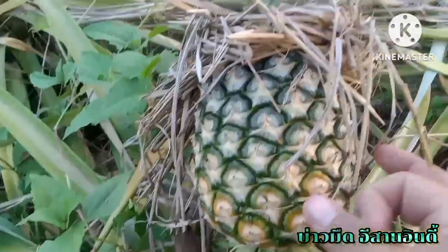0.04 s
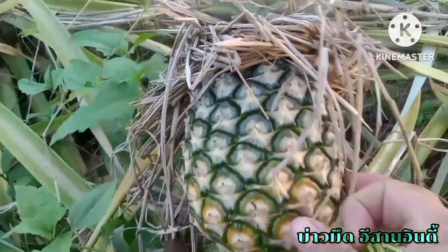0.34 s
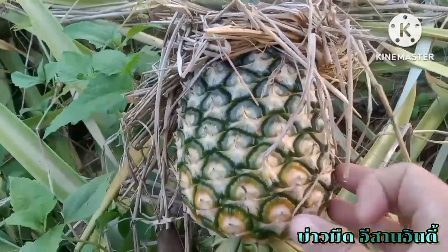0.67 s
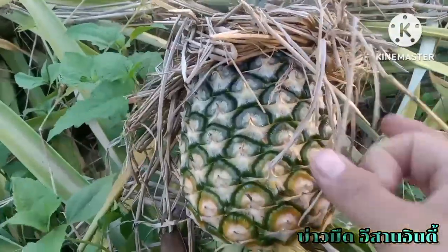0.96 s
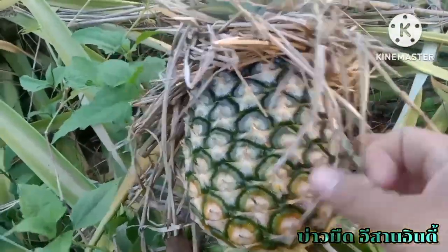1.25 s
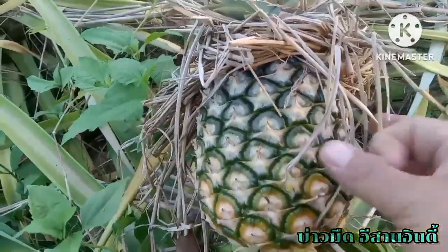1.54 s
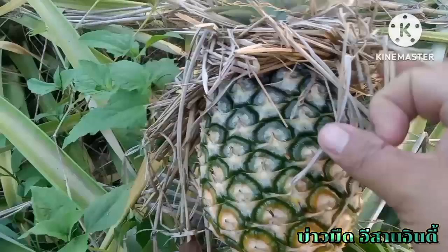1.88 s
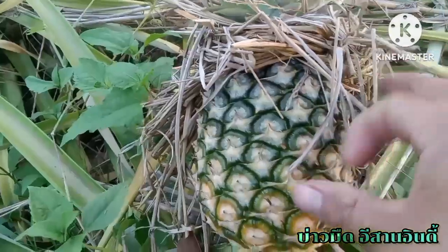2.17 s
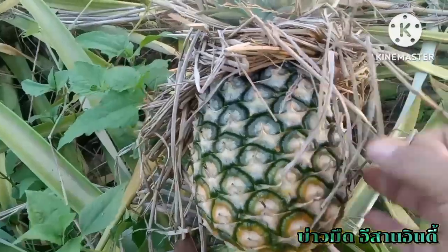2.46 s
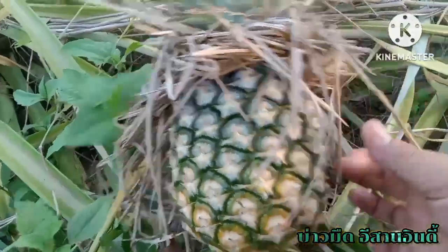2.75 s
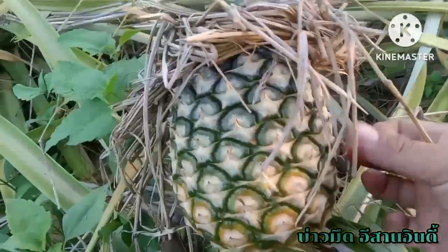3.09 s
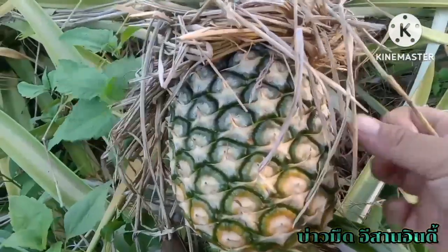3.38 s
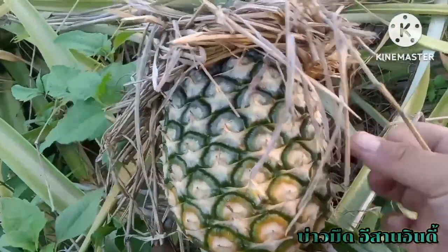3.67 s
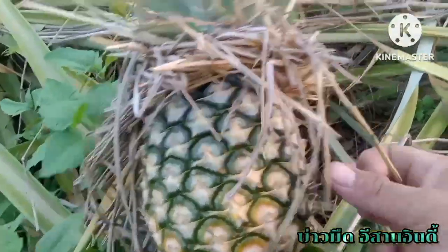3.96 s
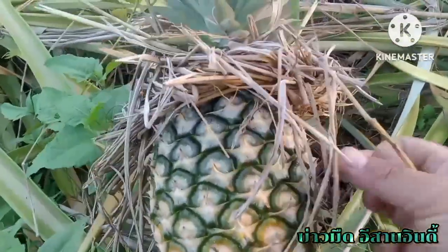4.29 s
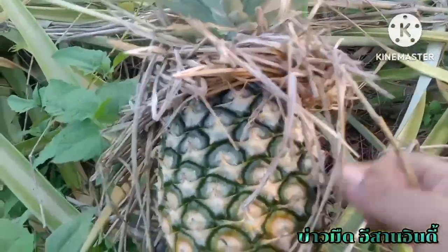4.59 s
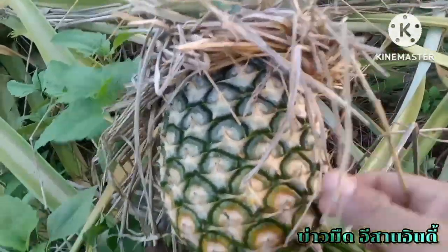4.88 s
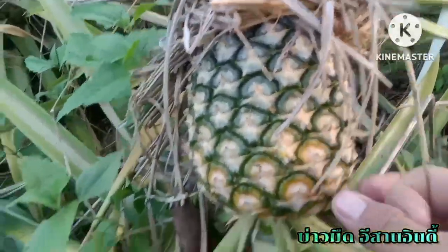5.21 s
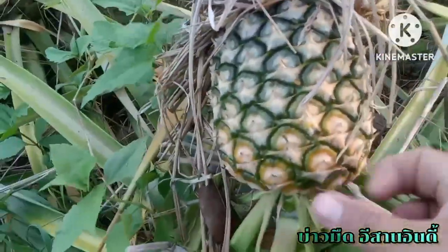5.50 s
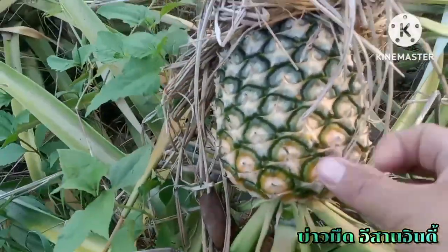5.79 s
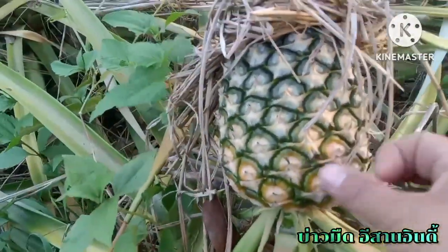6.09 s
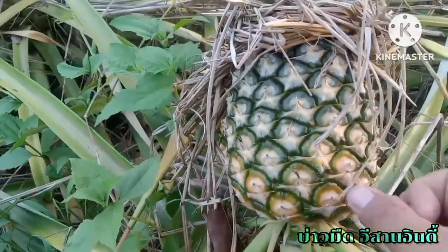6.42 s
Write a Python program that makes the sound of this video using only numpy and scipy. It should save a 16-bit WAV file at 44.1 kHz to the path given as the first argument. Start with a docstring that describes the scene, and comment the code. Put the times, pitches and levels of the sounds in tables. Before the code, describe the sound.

Close to the microphone, crisp, hollow taps come one after another as a finger flicks a pineapple in a quiet field. The knocks die quickly and shift a little in tone as the finger moves over the fruit. The hand brushes dry straw, adding light rustles and tiny snaps, busiest around the middle. The last taps are duller, over a faint outdoor hiss and distant rumble.

```python
"""A crisp, hollow knock with a crackle of straw: a fingernail flicks a ripe pineapple, up close.
Each of the twenty flicks clicks and crunches on the rind, rings the juicy fruit's damped modes
and shakes the dry straw tied round it. Between flicks the hand brushes the straw and rubs the rind.
Behind it lies a quiet field: a short, dull echo off leaves and ground, faint hiss and far rumble."""
import sys
import numpy as np
from scipy import signal
from scipy.fft import rfft, irfft, next_fast_len
from scipy.io import wavfile
from scipy.ndimage import map_coordinates

SR = 44100
rng = np.random.default_rng(int(sys.argv[2]) if len(sys.argv) > 2 else 0)


def to_wav(s):
    """Save 16-bit WAV."""
    ch = np.atleast_2d(s).T  # columns
    pcm = np.round(np.clip(ch, -1, 1) * 32767)  # PCM
    wavfile.write(sys.argv[1], SR, pcm.astype(np.int16))


N = 284445

# Cue levels are relative: each layer adds its own gain or EQ.
# The flicks: (time [s], place [0 base to 3 upper side], pitch [ratio], blow level [dB],
# contact cut-off [Hz], scale pitch [Hz], scale level [dB], nail level [dB], skid t60 [s],
# straw level [dB])
FLICKS = [(0.2947, 0.2, 1.008, -20.8, 3900, 3200, -12, 8.5, 0.004, -42),
          (0.7057, 0.7, 1.012, -33.9, 1100, 4200, -36, -4.9, 0.008, -50),
          (1.2234, 1.2, 1.009, -27.0, 2170, 5800, -22, 5.0, 0.006, -52),
          (1.5107, 1.2, 1.013, -30.0, 410, 6900, -33, -4.6, 0.018, -53),
          (1.7624, 1.4, 1.006, -28.0, 2400, 4600, -28, 1.0, 0.003, -53),
          (2.245, 1.3, 1.005, -28.2, 1650, 7000, -22, 2.0, 0.006, -55),
          (2.446, 1.0, 0.997, -32.3, 3010, 3000, -21, -0.5, 0.004, -52),
          (2.8448, 2.5, 0.987, -27.8, 1890, 6200, -13, 11.4, 0.007, -46),
          (3.1241, 2.2, 0.991, -27.0, 3320, 2400, -24, 6.5, 0.005, -42),
          (3.3903, 2.1, 0.991, -29.6, 1530, 7050, -16, 8.7, 0.007, -43),
          (3.6207, 2.0, 0.991, -30.2, 1450, 7200, -22, 4.4, 0.006, -46),
          (4.0016, 2.5, 0.988, -25.9, 2800, 2200, -18, 3.0, 0.005, -48),
          (4.2779, 2.6, 1.003, -30.5, 1230, 6900, -20, 6.8, 0.009, -43),
          (4.548, 3.0, 0.998, -27.4, 1130, 4000, -27, 3.8, 0.015, -50),
          (4.7914, 2.2, 0.987, -28.8, 9900, 7050, -20, 8.3, 0.006, -48),
          (5.0352, 1.3, 1.007, -31.2, 4000, 3700, -21, 2.5, 0.006, -50),
          (5.5805, 0.5, 1.012, -28.6, 1120, 7000, -26, -0.5, 0.02, -45),
          (5.8539, 0.0, 0.987, -24.3, 1190, 3100, -28, 1.7, 0.006, -52),
          (6.1197, 0.0, 0.981, -23.3, 960, 2950, -30, -4.1, 0.005, -54),
          (6.361, 0.2, 1.012, -29.5, 1670, 3000, -29, -7.0, 0.004, -55)]
# The fruit's modes and their weight by place struck: (frequency [Hz], nominal t60 [s],
# base [dB], lower flank [dB], side [dB], upper side [dB])
FRUIT_MODES = [(271.0, 0.075, -13.0, -9.2, -13.4, -8.7), (345.0, 0.075, -10.1, -11.9, -17.1, -16.1),
               (368.0, 0.062, -4.3, -10.0, -37.4, -11.3), (453.0, 0.058, -11.0, -2.6, -1.8, -2.6),
               (536.0, 0.05, -11.2, -2.1, -1.8, -3.0), (632.0, 0.0415, 0.0, 4.0, -0.5, -9.9),
               (779.0, 0.0297, -5.0, 0.3, 2.9, -4.0), (838.0, 0.0275, -0.4, 0.2, 6.8, -1.2),
               (979.0, 0.0185, -2.8, 3.4, 14.4, 1.3), (1078.0, 0.032, -4.9, -1.0, 11.9, -6.3),
               (1217.0, 0.0142, 3.2, -3.4, -20.5, -13.2), (1440.0, 0.034, -4.0, -8.9, -2.1, -2.9),
               (1663.0, 0.0187, -0.9, 0.2, 2.7, -1.1), (1876.0, 0.0101, 7.3, -3.1, -13.0, 8.3),
               (2233.0, 0.0098, 9.2, -14.0, 7.8, 7.1), (2982.0, 0.0062, 18.6, 14.3, -6.0, 18.5),
               (3616.0, 0.0054, 18.9, 12.3, 7.1, 18.6), (4940.0, 0.0047, 12.9, 14.9, 16.2, 2.1)]
# Single stalks snapping: (time [s], peak level [dB], ring pitch [Hz])
STALK_SNAPS = [(0.2628, -33, 6770), (0.283, -27.5, 6740), (0.292, -28, 6840), (0.3107, -32, 6700),
               (0.32, -27, 3950), (0.612, -45, 6400), (1.1545, -42, 7200), (1.173, -46, 7300),
               (1.269, -36.5, 6660), (2.7078, -39.5, 7060), (2.7236, -45, 7000), (2.823, -39, 7300),
               (2.9042, -42, 6600), (3.1177, -23.5, 7660), (3.4103, -36, 7160), (3.7115, -48, 5900),
               (3.9863, -34.5, 5460), (4.2845, -25, 6650), (5.0672, -37, 6500), (5.1246, -43, 6000),
               (5.405, -42, 2890), (5.7672, -36, 6150), (5.776, -39, 3000), (6.2379, -38, 7300)]
# The hand sweeping through the straw: (centre time [s], length [s], level [dB])
HAND_SWEEPS = [(0.306, 0.08, -43.5), (1.168, 0.038, -52.5), (2.035, 0.15, -55), (2.158, 0.15, -58.5),
               (2.403, 0.06, -55.5), (2.63, 0.41, -59.5), (2.89, 0.084, -48.5), (3.128, 0.1, -50.5),
               (3.694, 0.33, -58.5), (3.889, 0.11, -59), (4.146, 0.083, -58), (4.306, 0.051, -55),
               (5.354, 0.098, -62), (5.562, 0.11, -57.5), (5.73, 0.1, -64)]
# The fingertip rubbing the rind: (start [s], length [s], level [dB], rasp pitch [Hz])
RIND_RUBS = [(0.467, 0.1, -59.5, 3700), (0.609, 0.035, -60.5, 2740), (2.858, 0.12, -53, 4170),
             (2.978, 0.071, -56, 1990), (3.038, 0.15, -51.5, 1690), (3.381, 0.12, -55.5, 4300),
             (3.607, 0.14, -53, 4370), (4.275, 0.038, -50, 1580), (5.318, 0.12, -56.5, 2860),
             (5.46, 0.069, -58.5, 3020), (5.524, 0.11, -53.5, 3000), (5.676, 0.087, -56.5, 2850),
             (5.753, 0.031, -49, 2070)]

# Tone curves: (frequency [Hz], gain [dB])
NAIL_EQ = [(300, -16.5), (1000, -41), (2500, -18), (4500, -8.5), (6000, -0.5), (7200, 1), (8000, -8),
           (9000, -9.5), (11000, -22.5), (15000, -39)]  # the nail's bright click
SCALE_EQ = [(7500, -8.5), (10000, -13.5), (15000, -17.5)]  # how well the rind's scales radiate the top octave
CRUNCH_EQ = [(400, -18.5), (1000, 2), (2000, -7.5), (3500, -2.5), (5500, -2), (7000, 0), (8300, -3.5),
             (9500, -14.5), (15000, -37.5)]  # dry scales being crushed
STRAW_EQ = [(300, -30.5), (800, -20), (2000, -13.5), (3500, -11), (5500, -5.5), (7200, -1), (8500, -5.5),
            (9500, -17.5), (12000, -24.5), (15000, -28)]  # brittle stalks
RUB_EQ = [(300, -7.5), (900, -5.5), (1900, -5), (2500, -5), (3000, 1), (4500, -4.5), (6000, 4.5),
          (7500, 7.5), (8500, -6), (10000, -37)]  # skin on the rind
HISS_EQ = [(150, -12), (300, -5), (600, -6.5), (1000, -2.5), (2000, -7), (3500, -8), (5000, 0.5),
           (6000, -3), (7200, 0), (8000, -2), (8600, 7.5), (9300, -9), (11000, -38), (15000, -23.5)]  # outdoor hiss
RUMBLE_EQ = [(20, -32), (45, -18), (65, 4), (100, -0.5), (150, -4), (250, -18.5), (600, -32), (2000, -74)]  # far rumble
MIC_EQ = [(8000, 0.5), (10000, -5), (14000, -6.5), (16000, -7)]  # the microphone's soft treble


def knocks(scatter_db=2.54, knock_db=-3.0, loss_exponent=0.0561, pivot_hz=340):
    """The body of the hit: each blow rings the fruit's modes by where it lands; soft contact is duller."""
    out, t = np.zeros(N), np.arange(SR // 8) / SR
    hz, t60, *places_db = np.transpose(FRUIT_MODES)
    places = np.arange(len(places_db))
    # juicy flesh hurries the higher modes: the same energy leaves in a shorter time
    haste = (hz / pivot_hz) ** loss_exponent
    fade = np.sqrt(haste)[:, None] * decay(t, (t60 / haste)[:, None])
    for s, place, pitch, blow_db, contact_hz, *_ in FLICKS:
        crossfade = np.maximum(1 - abs(places - place), 0)
        mode_db = crossfade @ np.array(places_db) + scatter_db * rng.standard_normal(len(hz))
        modes = fade * np.cos(2 * np.pi * pitch * hz[:, None] * t)
        ring = -amp(mode_db) @ modes
        add(out, s, amp(blow_db + knock_db) * cut(ring, contact_hz, "low"))
    return cut(out, 290, "high", order=3)  # the bass falls away steeply below about 290 Hz


def through_flesh(x, lag_s=0.006097, corner_hz=790):
    """Long waves cross the soft flesh slowly, so each knock sinks in pitch as it dies."""
    size = next_fast_len(N + SR // 4)
    hz = np.fft.rfftfreq(size, 1 / SR)
    delay_s = lag_s / (1 + (hz / corner_hz) ** 2) ** 2
    phase = 2 * np.pi * np.cumsum(delay_s) * hz[1]
    return irfft(rfft(x, size) * np.exp(-1j * phase), size)[:N]


def thumps(thump_db=-24, thump_hz=170, t60=0.086):
    """The low end: each blow nudges the whole fruit on its stalk."""
    out, t = np.zeros(N), np.arange(SR // 8) / SR
    push = np.sin(2 * np.pi * thump_hz * t) * decay(t, t60)
    for s, _, _, blow_db, *_ in FLICKS:
        add(out, s, amp(blow_db + thump_db) * push)
    return out


def nail_clicks(trim_db=0.1, skid_db=-5, tick_gain=0.12, lead_s=0.00037, rasp_hz=6700):
    """The attack: the nail skids over the rind with a high rasp and lands with a sharp tick."""
    out, t = np.zeros(N), np.arange(SR // 20) / SR
    for s, *_, nail_db, skid_t60, _ in FLICKS:
        gain = amp(nail_db + trim_db)
        skid = rng.standard_normal(len(t)) * decay(t, skid_t60)
        skid *= amp(skid_db) / np.linalg.norm(skid)
        rasp = resonant(skid, rasp_hz * rng.uniform(0.68, 1.203), width_hz=500, boost_db=7)
        add(out, s - lead_s, gain * rasp)
        add(out, s, [-tick_gain * gain])
    return coloured(out, NAIL_EQ)


def scale_pings(t60=0.012):
    """The stiff scale under each blow pings briefly at its own pitch."""
    out, t = np.zeros(N), np.arange(SR // 20) / SR
    for s, *_, hz, scale_db, _, _, _ in FLICKS:
        add(out, s, -amp(scale_db) * decay(t, t60) * np.sin(2 * np.pi * hz * t))
    return coloured(out, SCALE_EQ)


def rind_crunch(crunch_db=-34.0, t60=0.042, graze_db=-13, graze_s=0.0382, nail_tracking=0.89):
    """The grit: the rind's dry scales are grazed just before each blow and crushed by it."""
    force, t = np.zeros(N), np.arange(N) / SR
    for s, *_, nail_db, _, _ in FLICKS:
        rise_db = graze_db - 60 * (s - t) / graze_s
        fall_db = -60 * (t - s) / t60
        envelope_db = np.where(t < s, rise_db, fall_db)
        near = abs(t - s) < 0.1
        force[near] += amp(nail_tracking * nail_db + crunch_db + envelope_db[near])
    grains = crackle(per_s=3500, spread_db=3, t60=0.003)
    return force * unit(coloured(grains, CRUNCH_EQ))


def straw_rustle(settle_t60=0.27):
    """Dry stalks crackle under the hand; every blow shakes them, and they settle."""
    settle = decay(np.arange(SR // 2) / SR, settle_t60)
    shake = np.zeros(N)
    for s, *_, straw_db in FLICKS:
        add(shake, s, amp(straw_db) * settle)
    grains = crackle(per_s=3500, spread_db=7, t60=0.0088)
    return np.hypot(shake, hand_pressure()) * unit(coloured(grains, STRAW_EQ))


def hand_pressure(touch_db=-70, climb_db=1.5, windup_db=-58.5, lead_s=0.01, unsteady_db=1.5):
    """Envelope of the hand on the straw: a resting touch, a finger tensing for each flick, and sweeps."""
    times, places, *_ = np.transpose(FLICKS)
    height = np.interp(np.arange(N) / SR, times, places)
    touch = amp(touch_db + climb_db * height)  # firmer higher up the fruit
    windups = amp(windup_db) * sum(swell(s - lead_s, length_s=0.097) for s in times)
    sweeps = sum(amp(db) * swell(s, length_s) for s, length_s, db in HAND_SWEEPS)
    return np.linalg.norm([touch, windups, sweeps], axis=0) * amp(unsteady_db * wobble(40))


def stalk_snaps(trim_db=-1, t60=0.056, width_hz=900, noise_mix=0.255):
    """Single stalks give way in short dry bursts, each ringing at its own pitch."""
    out, t = np.zeros(N), np.arange(SR // 20) / SR
    for s, db, hz in STALK_SNAPS:
        burst = coloured(rng.standard_normal(len(t)) * decay(t, t60), STRAW_EQ)
        snap = noise_mix * burst + band(burst, hz, width_hz)
        add(out, s, amp(db + trim_db) * snap / abs(snap).max())
    return out


def rind_rubs(flutter_db=2.1):
    """Skin catches and slips on the ridges of the rind; each stroke rasps at its own pitch."""
    out = np.zeros(N)
    flutter = amp(flutter_db * wobble(130))
    slips = flutter * coloured(crackle(per_s=4100, spread_db=0.5, t60=0.0011), RUB_EQ)
    for s, length_s, db, hz in RIND_RUBS:
        stroke = slips[int(s * SR):][:int(length_s * SR)]
        rasp = unit(resonant(stroke, hz, width_hz=220, boost_db=10))
        add(out, s, amp(db) * rasp * signal.windows.tukey(len(rasp)))
    return out


def foliage_echo(x, send_db=-25, t60=0.17, attack_s=0.0029, dull_hz=1600):
    """Leaves and ground scatter back a short, dull, weak echo."""
    t = np.arange(SR // 3) / SR
    tail = rng.standard_normal(len(t)) * decay(t, t60) * (1 - np.exp(-t / attack_s))
    tail = cut(tail / np.linalg.norm(tail), dull_hz, "low", order=1)
    return amp(send_db) * signal.fftconvolve(x, tail)[:N]


def field_bed(hiss_db=-62, rumble_db=-67):
    """The ambience: a near-steady high hiss and a far, unsteady rumble."""
    hiss_gain = amp(hiss_db + 0.41 * wobble(2.8))
    hiss = unit(coloured(rng.standard_normal(N), HISS_EQ))
    rumble_gain = amp(rumble_db + 3 * wobble(20))
    rumble = unit(coloured(rng.standard_normal(N), RUMBLE_EQ, size=16384))
    return hiss_gain * hiss + rumble_gain * rumble


def amp(db):
    """Decibels to gain."""
    return 10 ** (np.asarray(db) / 20)


def unit(x):
    """Scale to rms 1."""
    return x / np.sqrt(np.mean(x ** 2) + 1e-20)


def add(track, s, x):
    """Mix x into the track from time s."""
    part = track[max(round(s * SR), 0):][:len(x)]
    part += x[:len(part)]


def decay(t, t60):
    """An envelope that falls 60 dB every t60 seconds."""
    return np.exp(-np.log(1000) * t / t60)


def swell(s, length_s):
    """A smooth rise and fall centred on time s, from 0 to 1 and back."""
    return np.cos(np.pi * np.clip((np.arange(N) / SR - s) / length_s, -0.5, 0.5))


def wobble(per_s):
    """A smooth random curve, per_s knots a second."""
    knots = rng.standard_normal(int(N * per_s / SR) + 4)
    return map_coordinates(knots, [np.arange(N) * per_s / SR])


def crackle(per_s, spread_db, t60):
    """Tiny ringing grains at random times, each of its own pitch and size, rms 1."""
    when, pitch, size = rng.random((int(per_s * N / SR), 3)).T[..., None]
    k = np.arange(SR // 300)
    grains = amp(2 * spread_db * size) * np.sin(np.pi * pitch * k) * decay(k / SR, t60)
    positions = (when * N).astype(int) + k
    return unit(np.bincount(positions.ravel(), grains.ravel(), N)[:N])


def coloured(x, curve, size=2048):
    """x through a minimum-phase EQ that follows a tone curve."""
    hz, db = np.transpose(curve)
    log_hz = np.log(np.fft.rfftfreq(size, 1 / SR) + 1)
    gain = amp(np.interp(log_hz, np.log(hz), db))
    cepstrum = irfft(np.log(gain))
    fold = 1 + np.sign(size / 2 - np.arange(size))  # causal: no ringing ahead of an attack
    fold[0] = 1
    response = irfft(np.exp(rfft(cepstrum * fold)))
    return signal.fftconvolve(x, response)[:len(x)]


def cut(x, hz, kind, order=2):
    """A low-pass or high-pass filter."""
    return signal.sosfilt(signal.butter(order, hz, kind, fs=SR, output="sos"), x)


def band(x, hz, width_hz):
    """A resonant band-pass filter."""
    return signal.lfilter(*signal.iirpeak(hz, hz / width_hz, SR), x)


def resonant(x, hz, width_hz, boost_db):
    """x with one resonance added."""
    return x + amp(boost_db) * band(x, hz, width_hz)


def scene():
    """The mono mix: flicks, their echo, handling noise and the field."""
    flicks = through_flesh(knocks()) + thumps() + nail_clicks() + scale_pings() + rind_crunch()
    echo = foliage_echo(flicks)
    handling = straw_rustle() + stalk_snaps() + rind_rubs()
    return (flicks + echo + handling + field_bed())[None]


def record(dry):
    """The microphone softens the top octave, and a steep low-pass limits the band."""
    return cut(coloured(dry[0], MIC_EQ), hz=15600, kind="low", order=24)[None]


dry = scene()
out = record(dry)
to_wav(out)
```